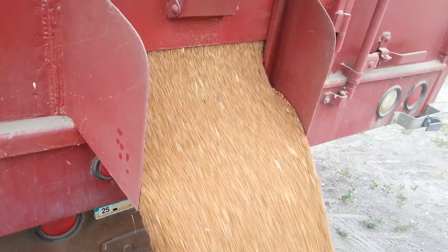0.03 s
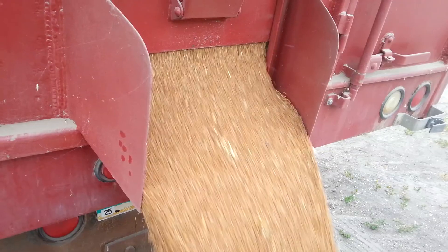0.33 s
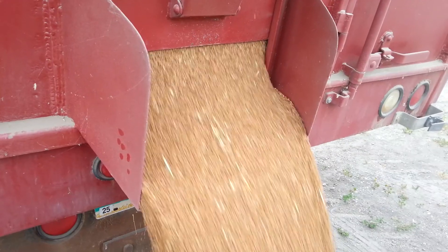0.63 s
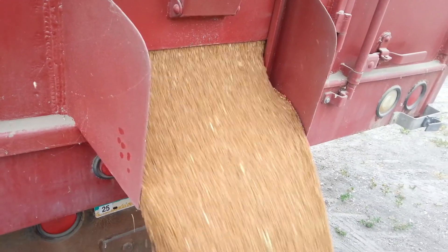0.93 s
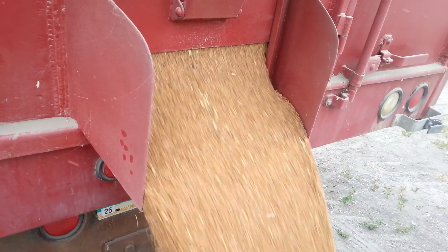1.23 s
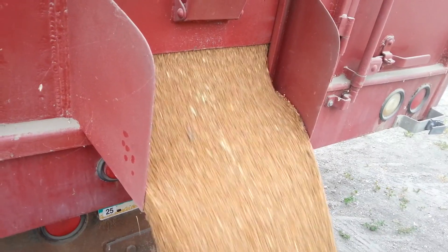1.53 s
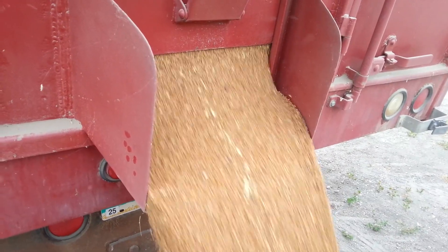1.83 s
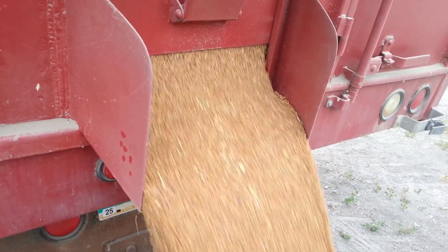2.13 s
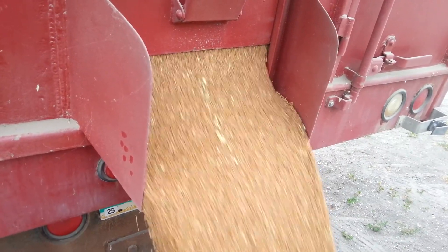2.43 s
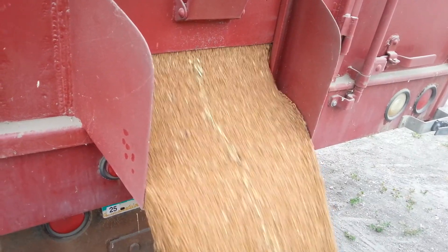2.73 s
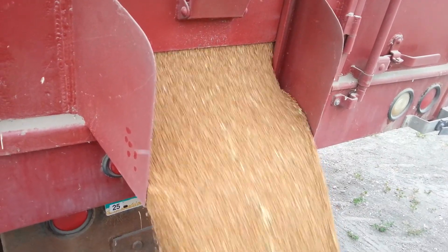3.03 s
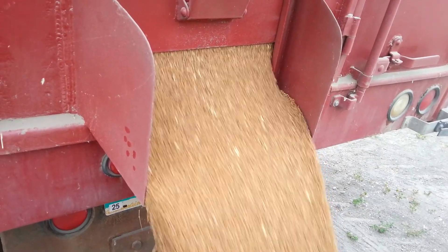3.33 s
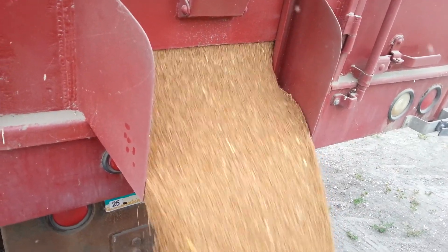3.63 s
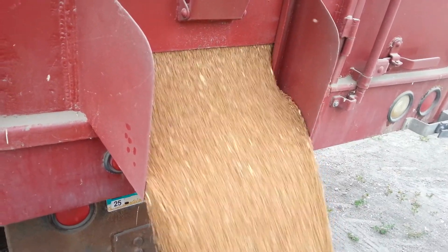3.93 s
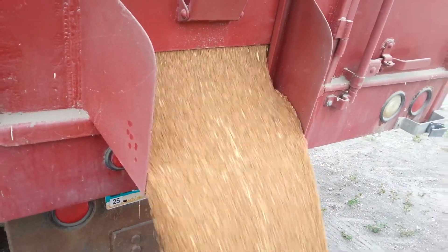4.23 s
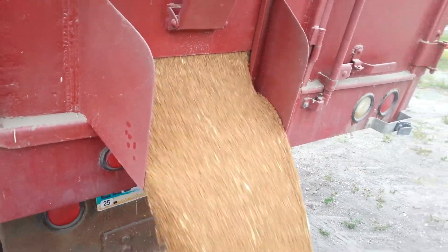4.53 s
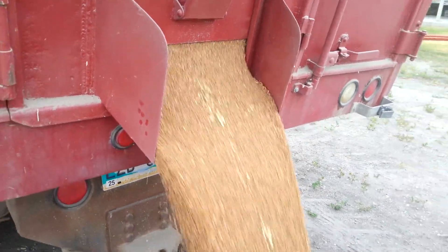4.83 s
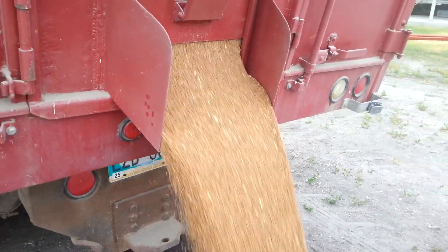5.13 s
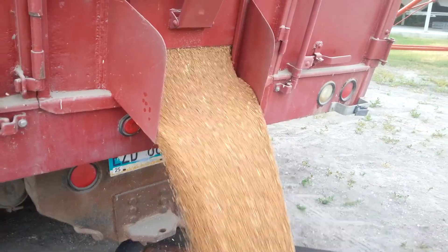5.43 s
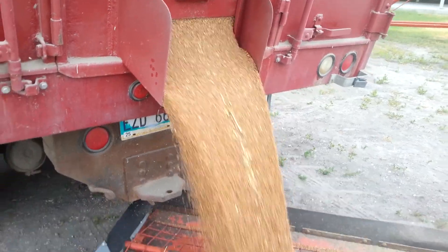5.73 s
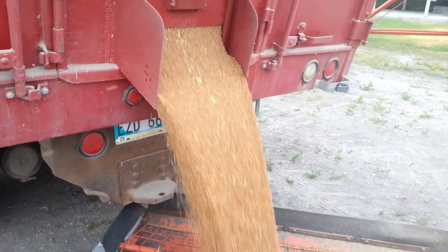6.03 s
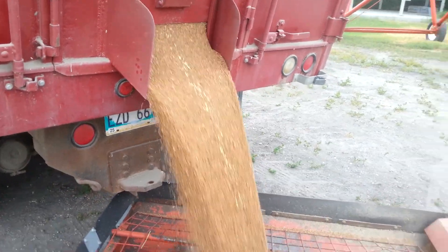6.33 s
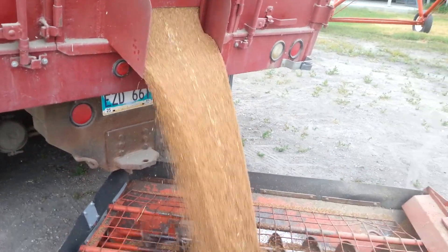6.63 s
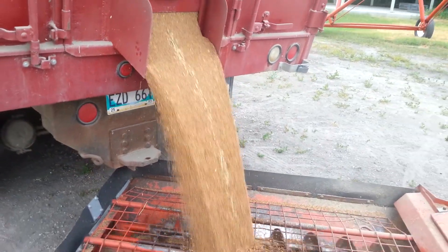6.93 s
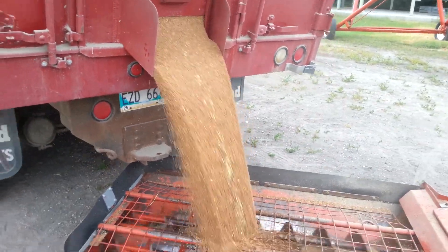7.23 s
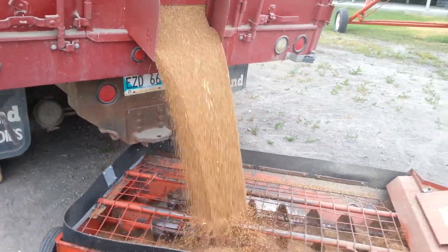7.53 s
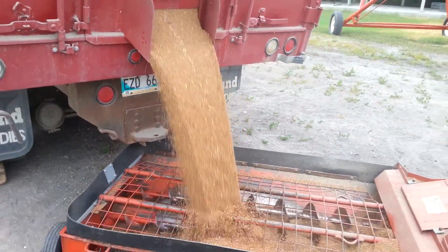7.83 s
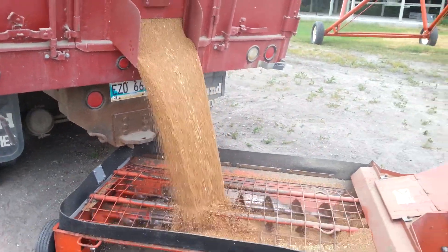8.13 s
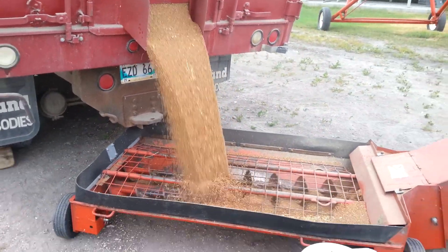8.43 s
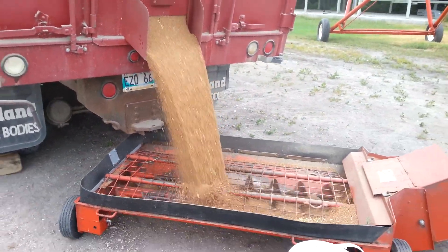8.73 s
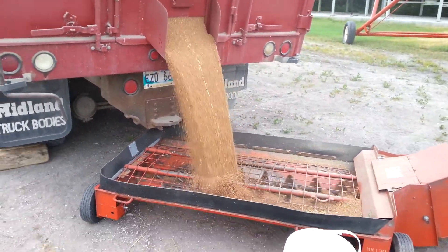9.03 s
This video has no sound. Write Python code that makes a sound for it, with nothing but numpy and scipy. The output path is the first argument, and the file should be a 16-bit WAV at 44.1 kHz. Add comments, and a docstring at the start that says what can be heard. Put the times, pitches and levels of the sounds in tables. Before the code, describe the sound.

An auger runs in a yard, its engine droning and gears whining, as a dense stream of wheat rushes off a truck chute near the microphone and lands on a steel grate. The turning screw rubs with quick, dull thumps of uneven strength. Then the microphone moves back and down, so the bright hiss recedes and the thumping dies away, leaving grainy pattering and engine clatter, with the machine's tones slowly swelling and fading.

```python
"""Outdoors, close beside a truck's tailgate chute. After a moment of silence, wheat is heard hissing off
the chute and pattering through a steel grate into the hopper of a running auger. Behind it an engine
drives the auger through whining gears, and the screw rubs and thumps in its tube five times a second.
From about 4.6 s the microphone backs away and turns down to the hopper: the chute recedes, the thumps
fade, and each drive tone swells and fades against its echo off the truck."""
import sys
import numpy as np
from scipy import signal
from scipy.fft import rfft, irfft, next_fast_len
from scipy.io import wavfile
from scipy.ndimage import uniform_filter1d, map_coordinates

SR = 44100
rng = np.random.default_rng(int(sys.argv[2]) if len(sys.argv) > 2 else 0)


def put_to_file(sound):
    """Save the sound as 16-bit audio at rate SR, in the file named by the first command-line argument."""
    columns = np.atleast_2d(sound).T  # one column per channel
    safe = np.clip(columns, -1, 1)
    whole_steps = np.round(safe * 32767)
    wavfile.write(sys.argv[1], SR, whole_steps.astype(np.int16))


N = 400869
WALK_START_S = 4.57


def amp(db):
    """Decibels to gain."""
    return 10 ** (np.asarray(db) / 20)


def unit(x):
    """Scaled to rms 1."""
    return x / np.sqrt(np.mean(x ** 2) + 1e-20)


def along(points, hz):
    """(Hz, value) points read on a log axis."""
    freqs, values = np.transpose(points)
    return np.interp(np.log(hz + 1), np.log(freqs + 1), values)


def curves(rows):
    """One value per sample for each column after the time."""
    times, *columns = np.transpose(rows)
    return [np.interp(np.arange(N) / SR, times, column) for column in columns]


def wobble(rate):
    """A smooth random curve, rate knots a second."""
    return map_coordinates(rng.standard_normal(int(N * rate / SR) + 4), [np.arange(N) * rate / SR])


def filtered(x, response):
    """x times a complex response of frequency."""
    size = next_fast_len(N + SR // 4)
    return irfft(rfft(x, size) * response(np.fft.rfftfreq(size, 1 / SR)), size)[..., :N]


def walked_s():
    """Seconds for which the microphone has been backing away."""
    return np.maximum(np.arange(N) / SR - WALK_START_S, 0)


# How alike the microphone's two ports hear the yard: frequency_hz, correlation
PORT_LIKENESS = [(60, 0.6), (270, 0.93), (440, 0.8), (700, 1), (1100, 0.05), (1600, 0.47), (2300, -0.07),
                 (3200, 0.2), (5400, -0.06), (14000, 0.05)]

def spread(pair, spectrum, rings=()):
    """Two unrelated signals become one coloured source of rms 1: bass alike at both ports, treble not."""
    def response(hz):
        angle = np.arccos(np.clip(along(PORT_LIKENESS, hz), 0, 1)) / 2
        lift_db = sum(db / (1 + (2 * (hz - pitch) / width) ** 2) for pitch, width, db in rings)
        return amp(along(spectrum, hz) + lift_db) * [np.cos(angle), np.sin(angle)]
    mid, side = filtered(pair, response)
    return unit(np.array([mid + side, mid - side]))


# A low hum in the background: pitch_hz, level_db
HUM_TONES = [(110.8, -36), (138.2, -42.5), (290.2, -34)]

def hum(waver_rad):
    """Loose low tones that drift against the engine."""
    t = np.arange(N) / SR
    return sum(amp(db) * np.sqrt(2) * np.sin(2 * np.pi * hz * t + waver_rad * wobble(5))
               for hz, db in HUM_TONES)


# The auger tube's rumble, heard from outside: frequency_hz, level_db
RUMBLE_SPECTRUM = [(10, -42), (30, -23), (90, -13.5), (150, -7), (205, -4), (280, -2), (380, -3.5),
                   (455, -6.5), (540, -1.5), (700, -7), (900, -6), (1500, -9.5), (3000, -20.5), (8000, -50)]
# Its hollow resonances: pitch_hz, width_hz, lift_db
TUBE_RINGS = [(415, 31, 3.5), (500, 30, 3.5)]

def rumble(level_db):
    """Grain churns up the hollow auger tube."""
    churn = amp(level_db + 0.94 * wobble(12))
    return churn * spread(rng.standard_normal((2, N)), RUMBLE_SPECTRUM, TUBE_RINGS)


# Engine speed, picking up slightly near the end: time_s, cycle_rate_hz
ENGINE_SPEED = [(2.7, 9.922), (5.5, 9.908), (7.2, 9.93), (8, 9.962)]
CYCLE_HZ = ENGINE_SPEED[0][1]

def engine_cycles():
    """Cycles so far, two crank turns each; the governor lets the speed wander a little."""
    speed, = curves(ENGINE_SPEED)
    return np.cumsum(speed * (1 + 0.000897 * wobble(5))) / SR


# The engine's rattle behind the grain: frequency_hz, level_db
CLATTER_SPECTRUM = [(200, -37), (450, -12.5), (600, -5.5), (730, -2), (860, -5.5), (1100, -8),
                    (1400, -10.5), (2000, -21), (5000, -30)]
# The auger's housing rings with it: pitch_hz, width_hz, lift_db
HOUSING_RINGS = [(607, 35, 5.5), (755, 91, 3.5), (910, 42, 0)]

def clatter(cycles, repeat_share, throb_db):
    """Valves and pistons rattle in a partly repeating pattern, in uneven beats tied to the crank."""
    pattern = rng.standard_normal((2, round(SR / CYCLE_HZ)))
    repeated = pattern[:, (cycles % 1 * pattern.shape[1]).astype(int)]
    rattle = np.sqrt(repeat_share) * repeated + np.sqrt(1 - repeat_share) * rng.standard_normal((2, N))
    beats = unit(sum(np.cos(2 * np.pi * (order * cycles + rng.random())) for order in (3, 4, 6, 8)))
    return spread(rattle * amp(throb_db * beats), CLATTER_SPECTRUM, HOUSING_RINGS)


def truck_echo(order, strength, past_null_m):
    """Gain of a tone whose echo off the truck adds and cancels in turn, once per wavelength of detour."""
    wavelength_m = 343 / (order * CYCLE_HZ)  # sound travels 343 m/s
    return np.sqrt(1 + strength ** 2 - 2 * strength * np.cos(2 * np.pi * past_null_m / wavelength_m))


# Firing, its third and fourth harmonics, gear whine, high whine, gear octave: periods_per_cycle
DRIVE_ORDERS = (6, 18, 24, 56, 108, 112)
# The same tones as the echo's detour grows: level_db, slope_db_per_m, echo_ratio, null_detour_m
DRIVE_TONES = [(-33.5, -.5, 0.23, 3.3), (-32.5, 1, 0.45, 1.63), (-34.5, -.5, 0.34, 0.94),
               (-25.5, .2, 0.41, .31), (-31, -4, 0.1, .16), (-34.5, 2.5, 0.5, .26)]
# Fainter engine tones: periods_per_cycle, relative_db
WEAK_TONES = [(9, -48), (12, -38), (21, -40), (27, -41), (42, -41), (48, -41), (53, -40), (60, -38),
              (69, -37), (73, -35.5), (74, -34.5), (75, -39), (76, -40), (77, -40), (96, -33.5), (99, -39),
              (100, -39), (129, -37)]

def drone(cycles, flutter_db, weak_db, skew_rad):
    """Firing tones, gear whine and fainter tones, all locked to the crank."""
    def tone(order):
        # reflections off the truck shift a tone differently at each port, high tones more than low
        shift = skew_rad * min(order / DRIVE_ORDERS[3], 1) * np.array([wobble(0.99), wobble(1)])
        return np.sqrt(2) * np.sin(2 * np.pi * (order * cycles + rng.random()) + shift)
    detour_m = 0.59 * walked_s()  # the echo's extra path grows 0.59 m/s
    firing, third, fourth, gears, whine, octave = [
        amp(db + slope * detour_m) * truck_echo(order, strength, detour_m - null_m) * tone(order)
        for order, (db, slope, strength, null_m) in zip(DRIVE_ORDERS, DRIVE_TONES)]
    weak = sum(amp(db + weak_db + 2.1 * wobble(2.09)) * tone(order) for order, db in WEAK_TONES)
    mesh = gears * amp(flutter_db * wobble(22))  # the load on the teeth varies
    high = (whine + octave) * amp(1.4 * wobble(9))
    return firing + (third + fourth) * amp(wobble(7)) + mesh + high + weak


# The machine's noise along the microphone's path: time_s, rumble_db, clatter_db
MACHINE_LEVELS = [(.8, -17, -19.5), (2.7, -18.5, -19.5), (5, -18, -20.5), (6.2, -18.5, -18.5),
                  (7.5, -18, -17), (9.1, -17.5, -16)]

def machine():
    """The running engine and auger, a steady bed behind the grain."""
    cycles = engine_cycles()
    rumble_db, clatter_db = curves(MACHINE_LEVELS)
    noise = rumble(rumble_db) + amp(clatter_db) * clatter(cycles, repeat_share=0.44, throb_db=2.5)
    return noise + drone(cycles, flutter_db=1.0, weak_db=-1.0, skew_rad=0.37) + hum(waver_rad=0.8)


# Turns on which the screw thumps hard in its tube: peak_s, relative_db, pitch_hz, length_s
THUMPS = [(0.995, -4.5, 290, .015), (1.192, -3, 300, 0.019), (1.974, -8, 380, 0.012),
          (2.367, -4, 320, 0.012), (2.564, -8.5, 340, 0.017), (2.763, -4.5, 363, .016),
          (3.164, -3, 298, 0.014), (3.357, -3, 337, 0.0083), (3.553, -5, 344, .016),
          (3.948, -3.5, 318, 0.012), (4.136, -8.5, 325, 0.024), (4.327, -2.5, 322, 0.0076),
          (4.526, -9, 331, 0.019), (4.924, -7, 288, 0.019), (5.123, -9, 333, .022),
          (5.489, -5.5, 344, .008), (6.083, -8.5, 363, 0.014)]

def rubs(first_s=0.992, turn_s=0.196, pitch_hz=327, length_s=0.017):
    """The screw rubs once a turn: rows for the hard thumps, and for softer rubs on all other turns."""
    turn_times = np.arange(first_s, N / SR, turn_s)
    rows = list(THUMPS)
    for s, (late, strong, high) in zip(turn_times, rng.standard_normal((len(turn_times), 3))):
        if all(abs(s - thump[0]) > turn_s / 2 for thump in THUMPS):
            db = -12 - max(s - WALK_START_S, 0) + 1.5 * strong  # 1 dB/s fainter on backing away
            rows.append((s + 0.01 * late, db, pitch_hz * np.exp(0.07 * high), length_s))
    return rows


def screw(level_db, droop_per_s, rough_rad, scrape_db):
    """Each rub of the screw on the tube swells into a rough, sinking groan inside a dull scrape."""
    groans, contact = np.zeros((2, N + SR))
    t = np.arange(-SR // 16, SR // 16) / SR
    for peak_s, db, hz, length_s in rubs():
        swell = amp(db + level_db) / np.cosh(2 * t / length_s)
        noise = rng.standard_normal(len(t))
        grit = unit(uniform_filter1d(uniform_filter1d(noise, size=90), size=90))
        periods = hz * (t - droop_per_s * t ** 2 / 2) + rng.random()
        start = round(peak_s * SR) - len(t) // 2
        groans[start:][:len(t)] += swell * np.sin(2 * np.pi * periods + rough_rad * grit)
        contact[start:][:len(t)] += swell
    # the scrape through the tube wall: frequency_hz, level_db
    spectrum = [(150, -40), (205, -14), (245, 8), (300, 2), (350, -29), (410, 12), (465, 3), (520, -3),
                (700, -23), (1500, -21), (4000, -60)]
    scrape = amp(scrape_db) * contact[:N] * spread(rng.standard_normal((2, N)), spectrum)
    return groans[:N] + scrape


def kernels(per_second, scatter_db, wash_db):
    """Tiny impacts of scattered size over the wash of countless fainter ones."""
    hits = rng.random((2, N)) < per_second / SR
    ticks = hits * rng.standard_normal((2, N))
    sizes = amp(scatter_db * np.clip(rng.standard_normal((2, N)), -2, 2))
    return unit(ticks * sizes) + amp(wash_db) * rng.standard_normal((2, N))


def clumped(stream, depth_db):
    """Clumps in the stream light up a few hundred hertz for a few tens of milliseconds."""
    frames = signal.stft(stream, nperseg=512)[2]
    patches = rng.standard_normal(frames.shape[1:])
    for _ in range(2):
        patches = uniform_filter1d(uniform_filter1d(patches, size=6, axis=0), size=6, axis=1)
    return signal.istft(frames * amp(depth_db * unit(patches)), nperseg=512)[1][:, :N]


# The largest clumps, heard from beside the chute: peak_s, level_db, pitch_hz
SPATTERS = [(1.078, -15, 4220), (1.445, -14, 3100), (1.63, -17, 4130), (2.138, -16, 3030),
            (2.329, -14.5, 3700), (4.691, -18, 2840)]

def spatters(width_hz, swell_s):
    """A clump of kernels scatters over the steel: a short swell of narrow, gritty noise."""
    out = np.zeros((2, N + SR))
    t = np.arange(-SR // 10, SR // 10) / SR
    hz = np.fft.rfftfreq(len(t), 1 / SR)
    for peak_s, db, pitch_hz in SPATTERS:
        noise = rng.standard_normal((2, len(t)))
        band = irfft(rfft(noise) / (1 + (2 * (hz - pitch_hz) / width_hz) ** 2), len(t))
        start = round(peak_s * SR) - len(t) // 2
        out[:, start:start + len(t)] += amp(db) * unit(band) / np.cosh(t / swell_s)
    return out[:, :N]


# Wheat on the chute and in the hopper, at close range: frequency_hz, level_db
CHUTE_SPECTRUM = [(400, -47), (1000, -3.5), (1600, -5), (2600, -3.5), (4600, -2), (5700, -4.5),
                  (8300, -5.5), (10300, -8.5), (12000, -7.5), (14500, -11)]
HOPPER_SPECTRUM = [(400, -25), (950, -5.5), (1800, -3), (2700, -8), (3700, -9.5), (4900, -5), (6000, -12.5),
                   (8500, -14), (10500, -14.5), (12500, -18), (14000, -26)]
# The steel of each rings under the stream: pitch_hz, width_hz, lift_db
CHUTE_RINGS = [(1750, 40, 8), (2160, 400, 2.5), (2910, 240, 3), (3670, 560, 4), (6870, 800, 0.9),
               (9170, 380, 3)]
HOPPER_RINGS = [(1150, 60, 4.3), (1400, 91, 5.8), (2250, 410, 6.2), (4460, 600, 1.4), (9600, 440, 5.8)]
# Their levels as the microphone moves from chute to hopper: time_s, chute_db, hopper_db
WHEAT_LEVELS = [(.8, -12, -22.5), (4.2, -12, -18.5), (5.3, -13, -16), (6.5, -15, -15), (7.7, -16, -16),
                (9.1, -20.5, -15)]

def wheat():
    """Kernels hiss off the chute and patter on the grate; the flow comes in slight surges."""
    chute_db, hopper_db = curves(WHEAT_LEVELS)
    flow_db = 0.45 * wobble(3.05) + 0.095 * wobble(14)
    sliding = clumped(kernels(per_second=9000, scatter_db=1.5, wash_db=0), depth_db=0.83)
    landing = clumped(kernels(per_second=4000, scatter_db=4.5, wash_db=-2), depth_db=1.43)
    chute = amp(chute_db + flow_db) * spread(sliding, CHUTE_SPECTRUM, CHUTE_RINGS)
    hopper = amp(hopper_db + flow_db + 0.41 * wobble(25)) * spread(landing, HOPPER_SPECTRUM, HOPPER_RINGS)
    return chute + hopper + spatters(width_hz=650, swell_s=0.01)


# The camera body shades each microphone port differently: frequency_hz, left_minus_right_db
PORT_BALANCE = [(60, -0.5), (210, 0.3), (700, 0), (1200, -1), (2000, -3.5), (2800, -2.5), (3900, -3),
                (5000, 1), (6200, 2), (7500, 1), (8600, 3), (10000, -1), (12000, -1), (13700, -5.5)]

def scene():
    """Machine, screw and wheat at the stereo microphone, reaching the left port first."""
    yard = machine() + screw(level_db=-3.5, droop_per_s=5.9, rough_rad=0.28, scrape_db=-7.5) + wheat()
    sides = np.array([[0.5], [-0.5]])
    def ports(hz):
        lead_s = 0.000304 * hz ** 2 / (hz ** 2 + 650 ** 2)  # the deep bass arrives from all round
        return amp(sides * along(PORT_BALANCE, hz)) * np.exp(2j * np.pi * hz * sides * lead_s)
    return filtered(yard, ports)


def record(dry):
    """The sound starts after a brief silence, with loud peaks rounded off and nothing above 14.6 kHz."""
    start_s, top_hz = 0.8145, 14640
    running = np.clip((np.arange(N) / SR - start_s) / 0.0015, 0, 1)
    limited = dry / (1 + np.abs(dry) ** 8) ** (1 / 8)
    return filtered(limited * running, lambda hz: np.clip((top_hz - hz) / 150, 0, 1))


dry = scene()
out = record(dry)
put_to_file(out)
```